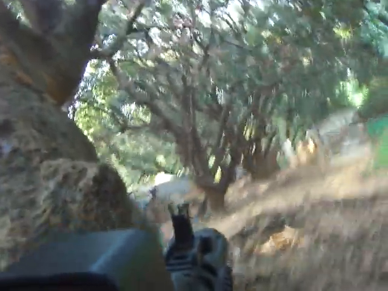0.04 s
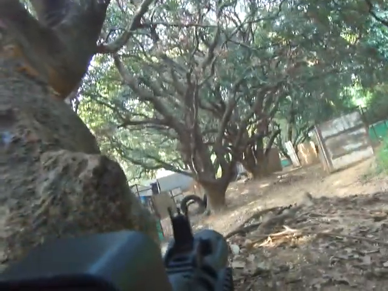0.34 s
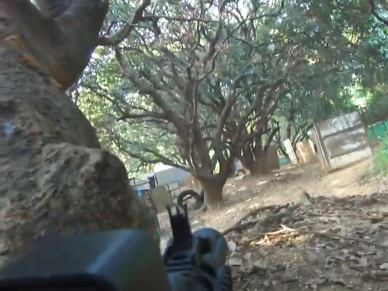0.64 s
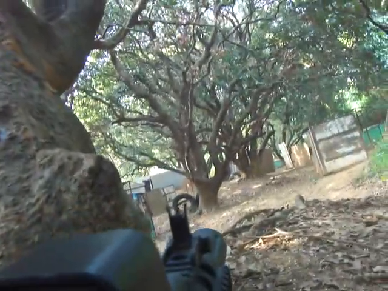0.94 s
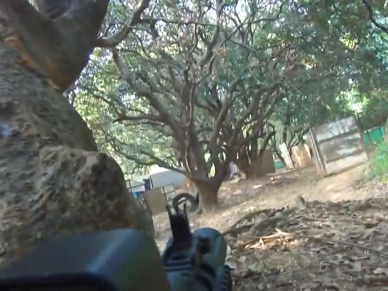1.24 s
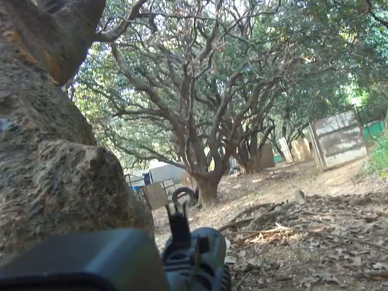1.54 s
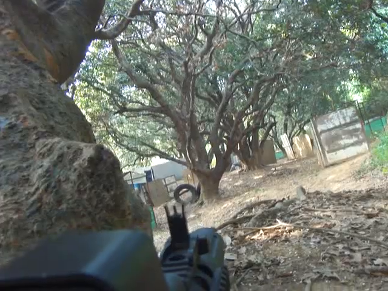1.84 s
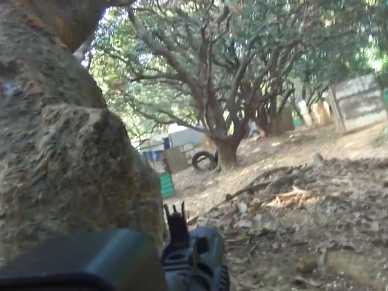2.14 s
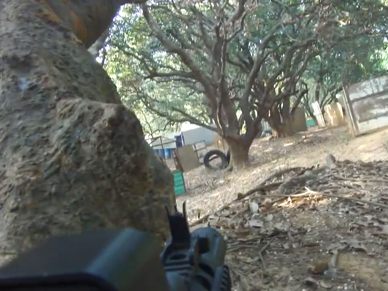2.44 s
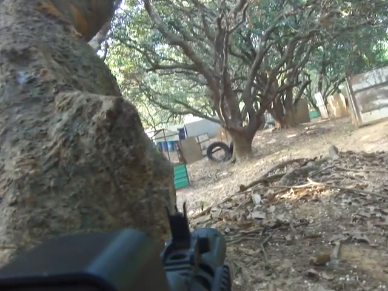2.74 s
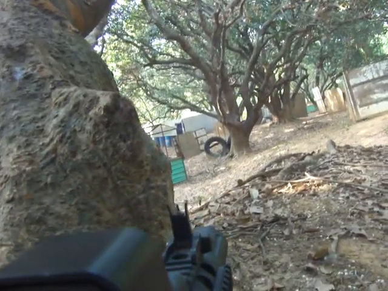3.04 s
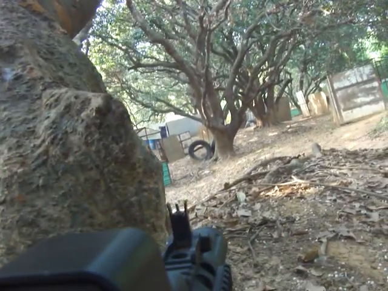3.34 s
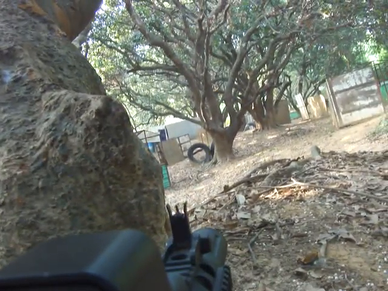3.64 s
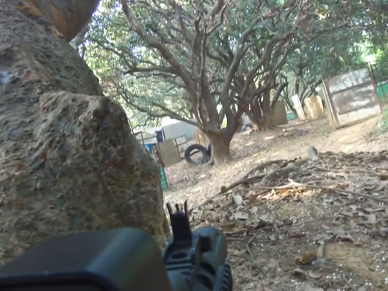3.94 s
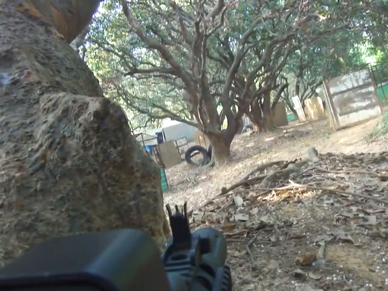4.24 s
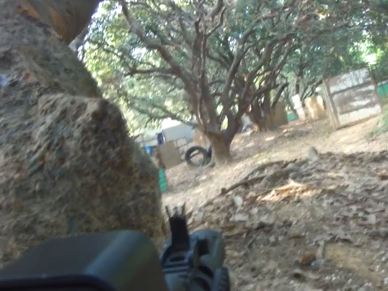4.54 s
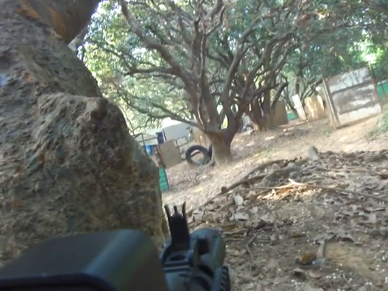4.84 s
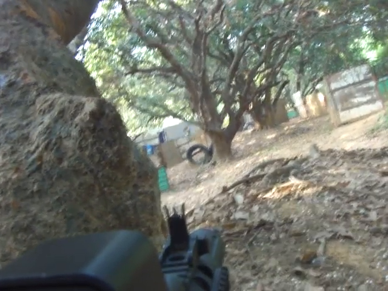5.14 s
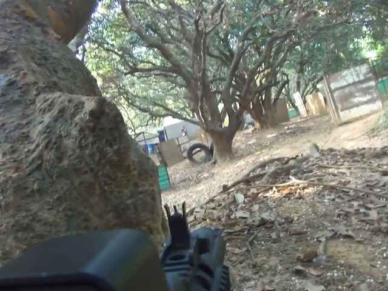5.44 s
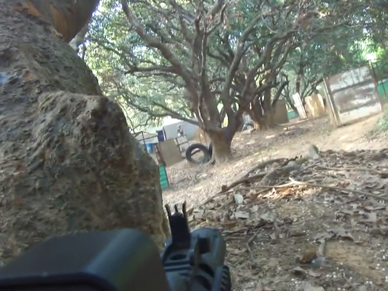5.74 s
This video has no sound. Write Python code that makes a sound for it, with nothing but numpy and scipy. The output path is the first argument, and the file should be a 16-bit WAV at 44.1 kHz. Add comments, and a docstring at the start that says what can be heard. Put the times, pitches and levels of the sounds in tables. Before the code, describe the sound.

An airsoft rifle scrapes against rock, its magazine wheel is wound with rattling clicks, then it fires two short automatic bursts.

```python
"""An electric airsoft rifle fires two automatic bursts: gears grind, a piston slams, air puffs out.
Before that it is settled against a rock, close by, and a finger starts winding the magazine wheel.
A small catch (the pawl) ticks over the wheel's teeth and plastic pellets rattle in the shell;
the winding goes on through the bursts. The wood all around hisses faintly."""
import sys
import numpy as np
from scipy import signal
from scipy.fft import rfft, irfft
from scipy.io import wavfile
from scipy.ndimage import uniform_filter1d

SR = 44100
rng = np.random.default_rng(int(sys.argv[2]) if len(sys.argv) > 2 else 0)


def generate_wav(sig):
    """Save sig (samples, or channels by samples) to the path in sys.argv[1] as 16-bit PCM at SR."""
    pcm = np.round(np.clip(np.atleast_2d(sig).T, -1, 1) * 32767).astype(np.int16)
    wavfile.write(sys.argv[1], SR, pcm)


N = 255339
TIME = np.arange(N) / SR

# one row a shot: (gears bite [s], piston let go [s], grind [dB], slam [dB], puff [dB])
SHOT_CYCLES = [(4.413, 4.482, -11, -3, -9), (4.495, 4.548, -13, 2, -28), (4.559, 4.608, -14, 1, -16),
               (4.62, 4.668, -13, 1.5, -24), (4.91, 4.949, -11, 2, -15), (4.967, 5.022, -13, -2, -36),
               (5.035, 5.083, -13.5, 0.5, -15), (5.094, 5.143, -14.5, 1, -18.5),
               (5.156, 5.204, -14.5, 0, -16.5)]
# the motor kicks in: (time [s], level [dB])
MOTOR_STARTS = [(4.414, -7), (4.9122, -7.5)]
# tone colour of the gearbox: (frequency [Hz], level [dB])
GEARBOX_SPECTRUM = [(59, -41), (100, -28), (157, 3.5), (238, -4), (522, 0.5), (853, 2.5), (1220, -8),
                    (1540, -9), (2240, -2), (3250, -3), (3660, -13), (5110, 4), (8030, -12), (9220, -9),
                    (11000, -10.5), (14300, -23), (22000, -120)]
# pitches at which the gearbox casing rings: (frequency [Hz], width [Hz], level [dB])
CASING_MODES = [(694, 580, -1), (1027, 95, 9), (1210, 180, 10), (1496, 68, 3), (1710, 190, 10),
                (1920, 370, 1.5), (2265, 310, 9), (2678, 180, 5.5), (3130, 340, 4.5), (4010, 190, -0.5),
                (4320, 200, -7), (5160, 260, 3.5)]
# pitches of the magazine shell: (frequency [Hz], width [Hz], hit by pawl [dB], hit by pellets [dB])
SHELL_MODES = [(845, 283, -4.5, 1.5), (1277, 443, -8, 0), (1870, 380, -4.5, -14), (2326, 430, 1.5, 7),
               (2873, 430, 0.5, -7.5), (3490, 536, -2, 1), (4510, 1120, -6, -3), (5136, 510, 1.5, 1),
               (5598, 384, 8, -5), (6405, 700, -13, -3), (7540, 1250, -9.5, -10), (8970, 1010, -5, -11),
               (9980, 380, -2, -29), (10640, 510, -5, -8)]


def rifle():
    """The motor kicks, gears pull the piston back, it snaps free and slams home, and air puffs out."""
    # a latch catches the gears after a burst: (time [s], level [dB])
    latch_hits = [(4.7476, 1.5), (5.2795, -4), (5.284, -11)]
    # tone colour of the piston hitting the end of its cylinder: (frequency [Hz], level [dB])
    slam_spectrum = [(150, -6), (700, -15), (2200, 7), (3800, 3.5), (5400, 10), (7500, -6.5), (10000, 2.5)]
    # long rings of the shoulder stock: (frequency [Hz], level [dB], time to fade by 60 dB [s])
    stock_modes = [(163.7, -36, 0.25), (229, -26, 0.18)]
    _, release, _, slam_db, puff_db = np.transpose(SHOT_CYCLES)
    slams = clicks(release, slam_db)
    clacks = clicks(*np.transpose(latch_hits))
    kicks = clicks(*np.transpose(MOTOR_STARTS))
    last_teeth = clicks(release - .0102, slam_db - 11) + clicks(release - .0053, slam_db - 1)
    piston = from_db(-4) * colour(chatter(slams, t60=.012), slam_spectrum)
    knocks = chatter(clacks, t60=.03) + chatter(last_teeth, t60=.0036) + chatter(kicks, t60=.022)
    metal = from_db(-10) * colour(knocks, GEARBOX_SPECTRUM)
    metal += from_db(-10.5) * resonate(knocks, CASING_MODES)
    motor = from_db(16.5) * resonate(kicks, [(1143, 110, -1.8), (1426, 220, -2), (1730, 110, -2)])
    # a narrow barrel gives off almost no deep bass
    muzzle = from_db(15.5) * resonate(clicks(release + .00875, puff_db), [(229, 274, 0)])
    jolts = from_db(-2) * slams + clacks
    stock = sum(from_db(db) * ring(jolts, hz, t60) for hz, db, t60 in stock_modes)
    return gears() + piston + metal + motor + muzzle + stock


def gears(mesh_hz=1170, sag=.13, jitter=.0452, whine_db=-13, spin_up_s=.024):
    """The motor draws the piston back; the gears slow and howl in the casing as the spring tightens."""
    # gear noise over one shot: (share of the cycle [0-1], rasp [dB], casing howl [dB])
    load_curve = [(0, -2.5, -32), (.15, -5.5, -18), (.45, -2.5, -6), (.8, -5.5, 1), (1, -3.5, -8.5)]
    # the gears run on once the trigger is let go: (start [s], stop [s], level [dB])
    coasts = [(4.679, 4.736, -17.5), (5.214, 5.266, -19)]
    share, rasp_db, howl_db = np.transpose(load_curve)
    rasp, howl, drawn = np.zeros((3, N))
    for start, release, db, _, _ in SHOT_CYCLES:
        cycle = (TIME - start) / (release - start)
        running = (cycle >= 0) & (cycle < 1)
        rasp += running * from_db(db + np.interp(cycle, share, rasp_db))
        howl += running * from_db(db + np.interp(cycle, share, howl_db))
        drawn += running * cycle
    coast = sum(level([(start, db - 4), ((start + stop) / 2, db + 1),
                       (stop, db - 5), (stop + .009, db - 12)]) for start, stop, db in coasts)
    # from rest the motor needs a moment to reach its speed, and strains until then
    lagging = sum((TIME > s) * np.exp(-np.abs(TIME - s) / spin_up_s) for s, _ in MOTOR_STARTS)
    wobble = rms_one(uniform_filter1d(rng.standard_normal(N), size=90))
    whine_hz = mesh_hz * (1 + sag * (.5 - drawn) - .5 * lagging + jitter * wobble)
    phase = 2 * np.pi * np.cumsum(whine_hz) / SR
    whine = from_db(whine_db) * (howl * (1 + 4 * lagging) * np.sin(phase) + rasp * np.sin(2 * phase))
    grinding = (rasp + coast) * from_db(-5) * grains(per_s=3600, spread_db=2.5)
    shaking = (howl + .5 * rasp + coast) * from_db(-5.5) * grains(per_s=3200, spread_db=-2)
    return colour(grinding, GEARBOX_SPECTRUM) + resonate(shaking, CASING_MODES) + whine


def wheel(usual_teeth_per_s=52.25, stir_power=1.23, settle_s=.0064):
    """A finger winds the wheel: gives its speed, how hard it stirs the pellets, and each tooth's tick."""
    # finger strokes; the speed ramps, holds and ramps again: (start [s], stop [s], first ramp [s],
    # last ramp [s], first speed [teeth/s], middle speed [teeth/s], last speed [teeth/s],
    # first tick [dB], last tick [dB], pellets at the start [dB], pellets at the end [dB])
    strokes = [(.8555, 1.242, .24, .052, 19.63, 48.95, 18.6, -20, -18, -25.5, -31.5),
               (1.67, 2.2303, .1765, .243, 28.15, 65.2, 36.4, -17.5, -21, -28, -28.5),
               (2.2303, 2.9113, .3346, .263, 42.54, 66.37, 33, -18.5, -22.5, -29.5, -26),
               (2.9113, 3.608, .3394, .222, 38.27, 62.78, 29.75, -18, -22, -30, -26),
               (3.608, 3.8025, .09, .1045, 34.3, 35.3, 39.3, -19, -16.5, -28, -29),
               (3.8025, 4.412, .285, .2045, 39.6, 58.4, 25.8, -18, -22.5, -29.5, -26),
               (4.412, 4.7778, .1, .1, 35, 40, 42, -34, -34, -27, -28),
               (4.7778, 4.903, .066, .059, 42.1, 46.4, 50.3, -28, -19.5, -29, -29),
               (4.903, 5.3637, .1, .2, 50, 50, 39, -36, -28, -29, -27.5),
               (5.3637, 5.805, .214, .227, 24.6, 28.2, 43.6, -26, -18.5, -24.5, -30.5)]
    # how hard the finger presses: (share of the stroke [0-1], added tick level [dB])
    pressure = [(0, 1.5), (.25, 0.85), (.5, 0.5), (.78, 0), (1, 1.5)]
    shares, press_db = np.transpose(pressure)
    speed, stirred = np.zeros((2, N))
    ticks = []
    for start, stop, first_ramp, last_ramp, first, middle, last, *levels in strokes:
        first_db, last_db, stir_from_db, stir_to_db = levels
        inside = (TIME >= start) & (TIME < stop)
        s = TIME[inside]
        share = (s - start) / (stop - start)
        corners = [start, start + first_ramp, max(stop - last_ramp, start + first_ramp), stop]
        rate = np.interp(s, corners, [first, middle, middle, last])
        teeth_passed = np.cumsum(rate) / SR
        at_tooth = np.searchsorted(teeth_passed, np.arange(teeth_passed[-1] - .25))
        tick_db = first_db + (last_db - first_db) * share + np.interp(share, shares, press_db)
        ticks += zip(s[at_tooth], tick_db[at_tooth])
        speed[inside] = rate
        # pellets get louder with the wheel's speed, and settle quickly when it stops
        stir_db = stir_from_db + (stir_to_db - stir_from_db) * share
        stirred[inside] = from_db(stir_db) * (rate / usual_teeth_per_s) ** stir_power
    decay = np.exp(-1 / (settle_s * SR))
    return speed, signal.lfilter([1 - decay], [1, -decay], stirred + 1e-18), ticks


def ratchet(teeth, buzz_db=-9, bounce_s=.0007, teeth_per_turn=31):
    """The pawl slides off each tooth, drops, bounces once and buzzes briefly on the shell."""
    # the wheel takes up its slack before winding: (time [s], tick [dB], knock on the housing [dB])
    slacks = [(0.742, -24, -6), (1.64, -39, -20)]
    # pitches of the knocked magazine housing: (frequency [Hz], width [Hz], level [dB])
    housing_modes = [(804, 260, 10.5), (1750, 1030, 5), (2430, 730, 4), (2800, 490, 7), (4780, 1350, 6)]
    slack_s, slack_db, housing_db = np.transpose(slacks)
    times, db = np.transpose(sorted([*teeth, *zip(slack_s, slack_db)]))
    tooth = np.arange(len(times))
    tick_db = db + .5 * rng.standard_normal(N)[tooth]
    drops = clicks(times, tick_db)
    # the wheel is slightly off centre, so the bounce, and with it the tone, drifts over a turn
    bounce_delay = bounce_s * (1 + .35 * np.sin(2 * np.pi * tooth / teeth_per_turn))
    bounces = clicks(times + bounce_delay, tick_db)
    buzz = chatter(drops + clicks(times - .0016, tick_db), t60=.024)
    force = from_db(18.5) * drops + from_db(5) * bounces + from_db(buzz_db) * buzz
    ticks = resonate(force, [row[:3] for row in SHELL_MODES])
    slack = resonate(chatter(clicks(slack_s, housing_db), t60=.009), housing_modes)
    return smear(ticks + slack)


def smear(x, hz=7000, width_hz=3000, stages=5):
    """The plastic delays some pitches more than others, spreading each tick out a little."""
    r = np.exp(-np.pi * width_hz / SR)
    feedback = [1, -2 * r * np.cos(2 * np.pi * hz / SR), r * r]
    return signal.sosfilt([feedback[::-1] + feedback] * stages, x)


def pellets(speed, stirred, hard_winding_db=-27, flutter_hz=12):
    """Pellets jostle in the shell; hard winding makes the feed drum whir and its gears groan."""
    # gears between wheel and drum: (rate [cycles per wheel tooth], level [dB])
    feed_gears = [(11.8, -23), (15.15, -23.5), (17.4, -22), (43.9, -24)]
    # pitches of the drum that feeds the pellets: (frequency [Hz], width [Hz], level [dB])
    drum_modes = [(753, 205, -1.5), (916, 120, -6), (1090, 210, -6), (1890, 670, -2), (2245, 270, -3),
                  (2682, 130, -1), (2993, 380, 5), (3716, 240, -2), (5350, 400, -18)]
    tooth_phase = 2 * np.pi * np.cumsum(speed) / SR
    smoothing = signal.butter(2, flutter_hz, fs=SR, output="sos")
    groan = 0
    for cycles, db in feed_gears:
        flutter = signal.sosfilt(smoothing, rng.standard_normal(N))
        groan += from_db(db) * rms_one(flutter * np.sin(cycles * tooth_phase))
    shaken_modes = [(hz, width, db) for hz, width, _, db in SHELL_MODES]
    rattle = resonate(stirred * grains(per_s=1500, spread_db=3), shaken_modes)
    effort = stirred ** 2 / from_db(hard_winding_db)
    whir = resonate(effort * (grains(per_s=2000, spread_db=5) + groan), drum_modes)
    hollow = resonate(stirred * grains(per_s=250, spread_db=7), [(156, 140, -3.5), (447, 520, -6.5)])
    return from_db(-5) * rattle + from_db(-4.8) * whir + from_db(-27.5) * hollow


def settling():
    """The rifle knocks, thuds and scrapes into place against the rock."""
    # hits on the rock: (time [s], knock [dB], thud [dB])
    rock_hits = [(.004, -10, -32), (0.033, -10, -15.5), (.077, -16.5, -24), (0.095, -13, -33),
                 (0.098, -10, -35), (.109, -8.5, -30), (0.11, -23, -40), (.144, -14, -19),
                 (0.151, -12, -27), (.184, -21, -22), (.282, -28, -31.5), (0.307, -28, -55),
                 (.343, -24, -55), (.365, -25, -55), (0.457, -24, -60)]
    # tone colour of a knock: (frequency [Hz], level [dB])
    knock_spectrum = [(88, -24), (150, -1), (262, -21), (362, -25), (474, -19), (889, 3.5), (1010, -5.5),
                      (1500, -8), (1890, -2), (3950, -13), (5460, -10.5), (11000, -23.5), (14300, -73),
                      (22000, -120)]
    # loudness of the scraping: (time [s], level [dB])
    scrape_curve = [(0, -30), (.06, -28.5), (.15, -29), (.23, -36), (.36, -39.5), (.47, -51.5), (.6, -47.5)]
    # tone colour of the scraping: (frequency [Hz], level [dB])
    grit_spectrum = [(24, -50), (40, -26), (244, -14.5), (440, -11), (791, -10), (1070, -7.5), (1490, -14),
                     (2070, -9), (2280, -9.5), (3480, -15), (5070, -11), (11000, -23), (14300, -55),
                     (22000, -120)]
    times, knock_db, thud_db = np.transpose(rock_hits)
    knocks = from_db(-5) * colour(chatter(clicks(times, knock_db), t60=.028), knock_spectrum)
    thuds = clicks(times, thud_db)
    body = from_db(-1.5) * ring(thuds, hz=238, t60=.048) + from_db(-10.5) * ring(thuds, hz=99, t60=.053)
    scrape = level(scrape_curve) * colour(grains(per_s=2800, spread_db=4.5), grit_spectrum)
    return knocks + body + scrape


def finger_slide():
    """The finger rubs back over the wheel for a new stroke."""
    # loudness of the rubbing: (time [s], level [dB])
    slide_curve = [(1.33, -79), (1.385, -36.5), (1.47, -37.5), (1.58, -42.5), (1.66, -40)]
    # its tone colour: (frequency [Hz], level [dB])
    spectrum = [(500, -4), (2500, -4), (4000, -1.5), (5500, 1.5), (7500, -1), (10500, 3)]
    return level(slide_curve) * colour(rng.standard_normal(N), spectrum)


def bumps():
    """Soft pushes set the whole magazine swinging for a moment."""
    # dull bumps in the hand while winding: (time [s], level [dB])
    pushes = [(1.9, -43), (1.99, -44), (3.59, -42), (3.67, -46), (3.76, -47), (3.86, -41)]
    return ring(clicks(*np.transpose(pushes)), hz=150, t60=.16)


def trees(x, t60=.27):
    """Trunks and ground scatter the sound back as a thin, dull tail of echoes."""
    tail = grains(per_s=1200, spread_db=19) * from_db(-60 * TIME / t60) * (TIME > .008)
    echoes = signal.fftconvolve(x, tail / np.linalg.norm(tail))[:N]
    return colour(echoes, [(100, -1), (800, -7), (3000, -27), (10000, -8)])


def wood_hiss():
    """The wood hisses faintly and steadily."""
    # tone colour of the hiss: (frequency [Hz], level [dB])
    air_spectrum = [(18, -60), (30, -19), (114, -10.5), (245, -7), (514, -6), (582, -3), (658, -4.5),
                    (726, -3.5), (1030, -8.5), (1250, -1.5), (1380, -9.5), (1950, -7), (3360, -16.5),
                    (5240, -19), (11000, -25), (14300, -71), (22000, -120)]
    return from_db(-44.5) * colour(rng.standard_normal(N), air_spectrum)


def faint_tones():
    """Twice a thin tone swells briefly in the air."""
    # the tones: (start [s], stop [s], frequency [Hz], level [dB])
    tones = [(0.518, 0.543, 1240, -50), (4.76, 4.921, 1447, -49.5)]
    sound = 0
    for start, stop, hz, db in tones:
        swell = level([(start, db - 4), (start + .0079, db), (stop, db + 7.5), (stop + .018, db - 26)])
        sound += swell * np.sqrt(2) * np.sin(2 * np.pi * hz * TIME)
    return sound


def from_db(db):
    """Turn decibels into a factor to multiply by."""
    return 10 ** (np.asarray(db) / 20)


def rms_one(x):
    """Scale a signal so that its average power is 1."""
    return x / np.sqrt(np.mean(x ** 2) + 1e-20)


def level(rows):
    """Loudness that follows (time [s], level [dB]) points, silent outside them."""
    s, db = np.transpose(rows)
    return from_db(np.interp(TIME, s, db, left=-150, right=-150))


def colour(x, spectrum):
    """Shape the tone along (frequency [Hz], level [dB]) points; white noise keeps its power."""
    hz, db = np.transpose(spectrum)
    grid = np.fft.rfftfreq(2 ** 13, 1 / SR)
    gains = from_db(np.interp(np.log(grid + 1), np.log(hz), db))
    # folding makes a filter that never sounds before it is struck
    fold = np.r_[1, np.full(len(grid) - 2, 2), 1, np.zeros(len(grid) - 2)]
    cepstrum = irfft(np.log(gains))
    response = irfft(np.exp(rfft(cepstrum * fold)))
    return signal.fftconvolve(x, response / np.linalg.norm(response))[:N]


def resonate(x, modes):
    """Make a body ring at several pitches, each given as (frequency [Hz], width [Hz], level [dB])."""
    out, power = 0, 0
    x = x + 1e-12 * np.cos(TIME * SR)
    for k, (hz, width, db) in enumerate(modes):
        r = np.exp(-np.pi * width / SR)
        gain = (1 - r * r) / 2
        band = [gain, 0, -gain, 1, -2 * r * np.cos(2 * np.pi * hz / SR), r * r]
        # filtering twice lets each ring swell in and leaves deep gaps between the pitches
        out = out + (-1) ** k * from_db(db) * signal.sosfilt([band, band], x)
        power += from_db(db) ** 2 * (1 - r) / 2
    return out / np.sqrt(power)


def ring(x, hz, t60):
    """Each click starts a pure tone of the same height that fades by 60 dB in t60 seconds."""
    r, step = from_db(-60 / (t60 * SR)), 2 * np.pi * hz / SR
    return signal.lfilter([0, np.sin(step)], [1, -2 * r * np.cos(step), r * r], x + 1e-18)


def clicks(times, db):
    """Clicks one sample long, at the given times and levels."""
    out = np.zeros(N)
    samples = np.round(np.asarray(times) * SR).astype(int)
    np.add.at(out, np.clip(samples, 0, N - 1), from_db(db))
    return out


def chatter(hits, t60):
    """Each click becomes a dying burst of tiny contacts."""
    decay = from_db(-60 / (t60 * SR))
    return signal.lfilter([1], [1, -decay], hits + 1e-18) * rng.standard_normal(N)


def grains(per_s, spread_db):
    """Random contacts of uneven strength, with an average power of 1."""
    sizes = from_db(spread_db * np.clip(rng.standard_normal(N), -2, 2)) * rng.choice([-1, 1], N)
    return rms_one(sizes * (rng.random(N) < per_s / SR))


def scene():
    """Rifle and magazine up close, the wood around them."""
    speed, stirred, teeth = wheel()
    near = ratchet(teeth) + pellets(speed, stirred) + bumps() + rifle() + settling() + finger_slide()
    return (near + wood_hiss() + from_db(-18.5) * trees(near) + faint_tones())[None]


def record(dry):
    """Peaks are rounded; the lowest bass and the highest treble are cut off."""
    ceiling, low_hz, high_hz = .7, 50, 11000
    rounded = ceiling * np.tanh(dry / ceiling)
    thin = signal.sosfilt(signal.butter(2, low_hz, "high", fs=SR, output="sos"), rounded)
    return signal.sosfilt(signal.cheby1(12, .2, high_hz, fs=SR, output="sos"), thin)


dry = scene()
out = record(dry)
generate_wav(out)
```